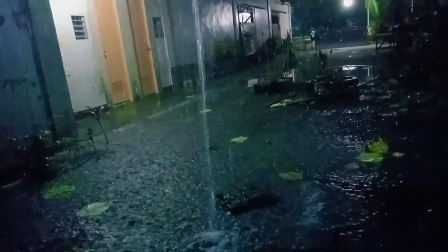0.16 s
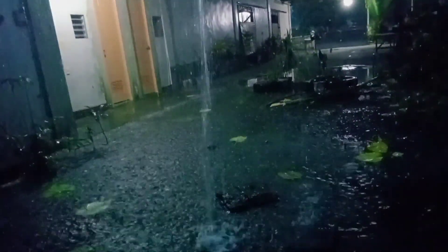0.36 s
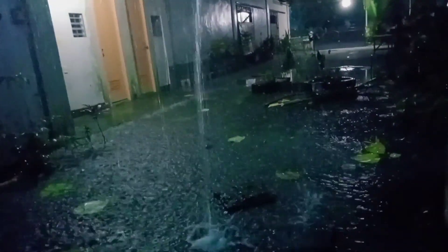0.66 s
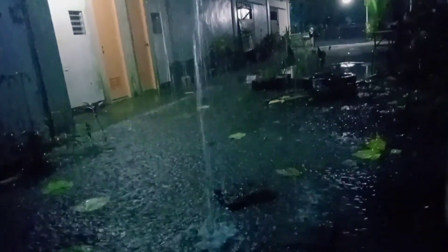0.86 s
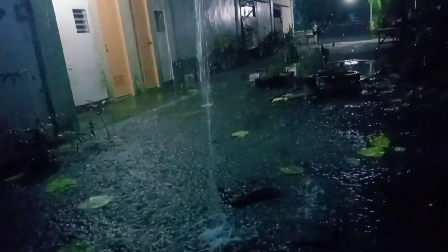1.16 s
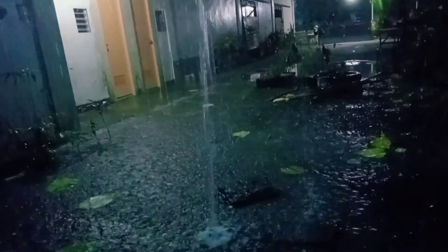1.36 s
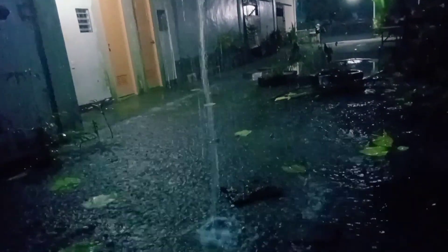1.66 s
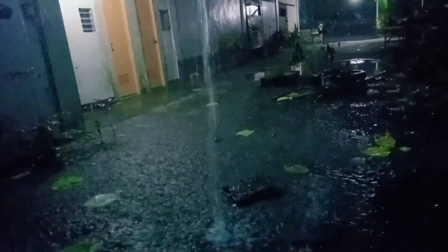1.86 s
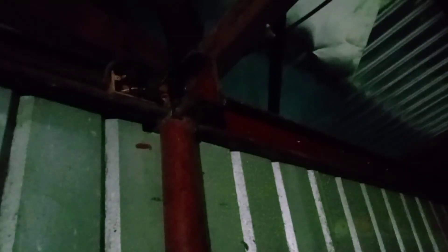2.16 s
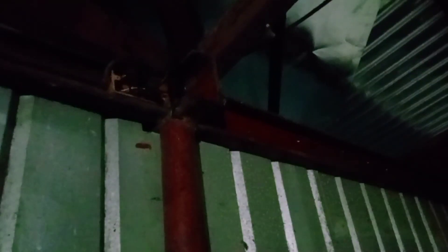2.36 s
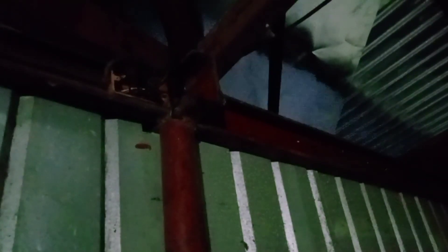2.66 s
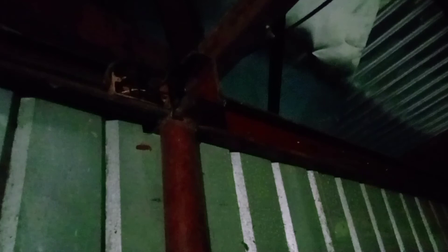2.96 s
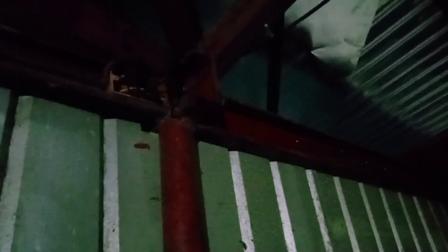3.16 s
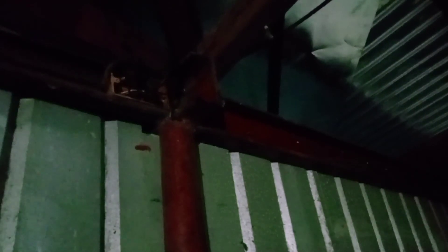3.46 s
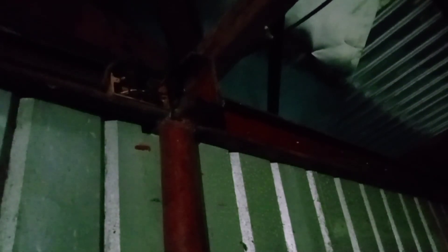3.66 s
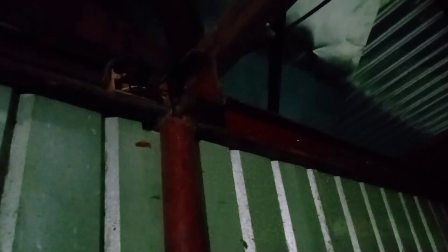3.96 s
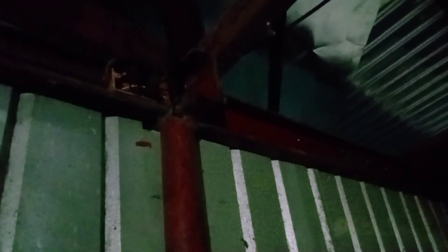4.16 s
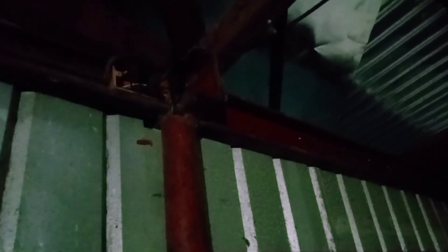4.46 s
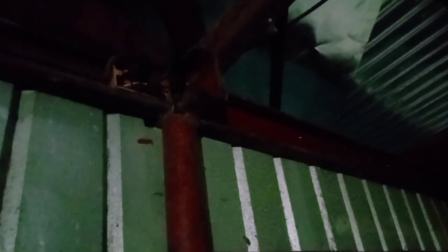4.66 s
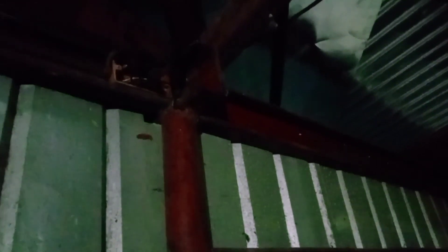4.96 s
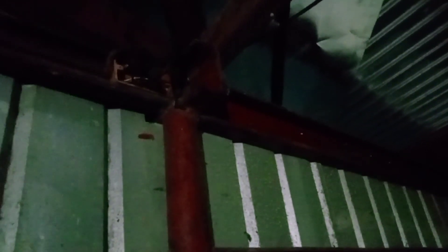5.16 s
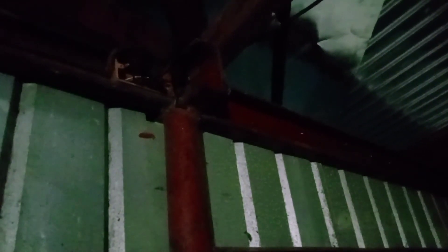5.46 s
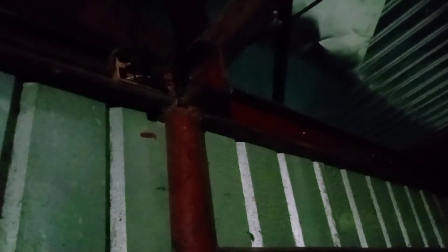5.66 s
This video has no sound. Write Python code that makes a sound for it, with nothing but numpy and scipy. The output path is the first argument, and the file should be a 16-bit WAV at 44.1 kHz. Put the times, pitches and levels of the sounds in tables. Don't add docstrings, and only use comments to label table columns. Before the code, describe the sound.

A dense downpour hisses on standing water, stops dead, and returns as lower metallic roof drumming with gusts and low thunder rumbles.

```python
import sys
import numpy as np
from scipy import signal
from scipy.fft import rfft, irfft, next_fast_len
from scipy.io import wavfile
from scipy.ndimage import uniform_filter1d

SR = 44100
rng = np.random.default_rng(int(sys.argv[2]) if len(sys.argv) > 2 else 0)


def pcm_store(signal):
    levels = np.round(np.clip(np.atleast_2d(signal), -1, 1) * 32767)
    wavfile.write(sys.argv[1], SR, levels.astype(np.int16).T)


def boost_factor(decibels):
    exponent = np.asarray(decibels, float) / 20
    return 10 ** exponent


N = 256662
CHANGE_S = 2.0

# pitch_hz, level_db (per Hz)
YARD_TONE = [(100, -6), (230, -6), (300, -8), (600, -5.5), (1500, -1.5), (2700, -3.5), (4000, -15.5),
             (5300, -21.5), (6800, -18.5), (7500, -28.5), (10300, -37.5), (11400, -32), (13300, -33.5),
             (14500, -40)]
# peak_s, added_share_db
ROAR_SWELLS = [
    (.72, -18),
    (1.3, -19),
]


def yard():
    t = np.arange(N) / SR
    squall_start_s, squall_rise_s, squall_db = 1.3, 0.14, 0.7
    roar_db = -16.5 + squall_db * np.clip((t - squall_start_s) / squall_rise_s, 0, 1)
    spray_db = 0.9 - 1.2 * np.minimum(t, CHANGE_S)
    bubbles = boost_factor(-17) * pings(per_s=900.0, spread_db=1.0, cycles=22.0, low_hz=882, high_hz=12900)
    water = rain(roar_db, spray_db, YARD_TONE, per_s=3000.0, spread_db=2.5, clump_db=1.95,
                 near_low_db=-14.0, near_high_db=-1.5, patchy_db=-0.06, ringing=bubbles)
    thickening = 1 + surges(ROAR_SWELLS, rise_db_per_s=61, fall_db_per_s=61)
    return boost_factor(-2.5) * water * thickening


# pitch_hz, level_db (per Hz)
ROOF_TONE = [(100, -6), (200, -1.5), (400, 0.5), (750, 1), (1200, -0.5), (2300, -1), (3200, -4.5),
             (4600, -8), (7000, -29.5), (8300, -43.5), (9600, -41.5), (11400, -31.5), (12600, -40.5),
             (15000, -47)]


def roof():
    since_s = np.arange(N) / SR - CHANGE_S
    roar_db = -14.5 - 0.5462 * since_s
    spray_db = 0.08 * since_s
    tinks = boost_factor(-21) * pings(per_s=1200.0, spread_db=2.5, cycles=68.0, low_hz=498.8, high_hz=12020)
    return boost_factor(-2.0) * rain(roar_db, spray_db, ROOF_TONE, per_s=4400.0, spread_db=3.0, clump_db=2.05,
                            near_low_db=-9.0, near_high_db=-8.0, patchy_db=0.2, ringing=tinks)


# pitch_hz, level_db
MIC_BASS_LOSS = [(20, -20.5), (30, -19), (52, -13), (85, 0.5), (100, 4)]


def rain(roar_db, spray_db, tone, per_s, spread_db, clump_db, near_low_db, near_high_db, patchy_db, ringing):
    far = rng.standard_normal((2, N))
    near = [drops(per_s, spread_db, clump_db), drops(per_s, spread_db, clump_db)]
    edges_hz = 20 * 2 ** np.arange(0, 10.1, 0.5)
    out = ringing
    for k, (low_hz, high_hz) in enumerate(zip(edges_hz, edges_hz[1:])):
        log_middle = np.log(low_hz * high_hz) / 2
        near_db = np.interp(log_middle, np.log([300, 12000]), [near_low_db, near_high_db])
        struck = (far[k % 2] + boost_factor(near_db) * near[k % 2]) / np.sqrt(1 + boost_factor(2 * near_db))
        half_octave = signal.butter(2, [low_hz, high_hz], "band", fs=SR, output="sos")
        band = signal.sosfilt(half_octave, struck)
        swing_db = spray_db * np.interp(log_middle, np.log([5000, 8000]), [0, 1])
        out = out + boost_factor(swing_db + patchy_db * drift(15.0)) * band
    return boost_factor(roar_db) * rms_one(coloured(out, tone, MIC_BASS_LOSS))


def drops(per_s, spread_db, clump_db):
    size_db = spread_db * np.minimum(rng.exponential(1, N), 5)
    sizes = boost_factor(size_db) * rng.choice([-1, 1], N)
    chance = per_s * boost_factor(clump_db * drift(25.0)) / SR
    return rms_one(sizes * (rng.random(N) < chance))


def pings(per_s, spread_db, cycles, low_hz, high_hz):
    hits = drops(per_s, spread_db, clump_db=3.0)
    dealt = rng.integers(0, 24, N)
    out = 0
    for k, hz in enumerate(np.geomspace(low_hz, high_hz, 24)):
        r = boost_factor(-60 * hz / (cycles * SR))
        w = 2 * np.pi * hz / SR
        struck = hits * (dealt == k) + 1e-18
        out = out + signal.lfilter([np.sin(w) * np.sqrt(1 - r)], [1, -2 * r * np.cos(w), r * r], struck)
    return rms_one(out)


# peak_s, level_db
GUSTS_ON_SHEET = [
    (2.3, -31),
    (2.68, -25.5),
    (3.3, -31),
    (3.7, -32),
    (4.5, -29),
    (5.7, -32),
]


def sheet():
    resonance = [(400, -40), (620, -4), (770, 0), (950, -5), (1500, -50)]
    hum = coloured(drops(1500.0, spread_db=2.5, clump_db=2.5), resonance)
    return surges(GUSTS_ON_SHEET, rise_db_per_s=28.5, fall_db_per_s=45.0) * rms_one(hum)


# start_s, level_db
SPRAY_BURSTS = [
    (0.174, -41),
    (.195, -44),
    (.262, -48),
    (.385, -49),
    (1.215, -46),
    (1.245, -47),
    (1.53, -46.5),
    (3.435, -53),
    (3.515, -52),
]


def splashes():
    t = np.arange(N) / SR
    t60_s = 0.11
    level = np.zeros(N)
    for start_s, level_db in SPRAY_BURSTS:
        level += (t > start_s) * boost_factor(level_db - 60 * np.maximum(t - start_s, 0) / t60_s)
    top_band = [(8000, -55.5), (10800, -10.5), (11500, -3.0), (13300, -2.5), (15000, -23)]
    spray = coloured(drops(6000.0, spread_db=3.0, clump_db=2.5), top_band)
    return level * rms_one(spray)


# peak_s, level_db
THUNDER_PEALS = [(.1, -39), (.45, -36.5), (1.03, -41), (1.85, -35), (2.27, -25), (2.68, -31.5),
                 (2.9, -35.5), (3.15, -36), (3.65, -31.5), (4.0, -38), (4.25, -34.5), (4.5, -39.5),
                 (5.2, -39), (5.6, -35.5)]
# middle_s, length_s, pitch_hz, level_db
THUNDER_BOOMS = [(0.615, 0.14, 232, -37.5), (1.826, 0.12, 139, -28), (2.266, 0.17, 120, -30),
                 (2.294, 0.11, 150, -34.5), (3.013, .1, 119, -33.5), (3.233, 0.24, 118.5, -26),
                 (3.586, 0.11, 118, -33), (3.757, 0.077, 118, -33), (3.888, 0.11, 119, -32.5),
                 (4.35, 0.056, 142, -37), (5.078, 0.17, 227, -35.5)]


def thunder():
    t = np.arange(N) / SR
    rumble = [(90, 0.5), (170, -3.5), (320, -26), (800, -62)]
    roll = rms_one(coloured(rng.standard_normal(N), rumble, MIC_BASS_LOSS))
    lumps = boost_factor(3.7 * drift(6.2))
    out = surges(THUNDER_PEALS, rise_db_per_s=46.5, fall_db_per_s=91) * lumps * roll
    wobble = 0.75 * drift(8.7)
    for middle_s, length_s, hz, level_db in THUNDER_BOOMS:
        swell = np.cos(np.pi * np.clip((t - middle_s) / (1.23 * length_s), -0.5, 0.5))
        out += boost_factor(level_db + 5.5) * swell * np.sin(2 * np.pi * hz * t + wobble)
    return out


def surges(rows, rise_db_per_s, fall_db_per_s):
    t = np.arange(N) / SR
    gain = 0
    for peak_s, level_db in rows:
        gain = gain + boost_factor(level_db - np.maximum(rise_db_per_s * (peak_s - t), fall_db_per_s * (t - peak_s)))
    return gain


def drift(rate_hz):
    r = np.exp(-80 * np.pi * rate_hz / SR)
    noise = rng.standard_normal(N // 40 + 2002)
    slow = signal.lfilter([1], [1, -2 * r, r * r], noise)[2000:]
    return np.interp(np.arange(N) / 40, np.arange(len(slow)), rms_one(slow))


def coloured(x, *spectra):
    size = next_fast_len(N)
    log_hz = np.log(np.arange(size // 2 + 1) * SR / size + 1)
    gain_db = 0
    for spectrum in spectra:
        hz, db = np.transpose(spectrum)
        gain_db = gain_db + np.interp(log_hz, np.log(hz), db)
    return irfft(rfft(x, size) * boost_factor(gain_db), size)[:N]


def rms_one(x):
    return x / np.sqrt(np.mean(x ** 2) + 1e-20)


def suppress_noise(x, floor_db, over):
    spectrum = signal.stft(x, nperseg=1024, noverlap=768)[2]
    power = np.abs(spectrum) ** 2 + 1e-20
    steady = uniform_filter1d(uniform_filter1d(power, size=9, axis=1), size=31, axis=2)
    hz = np.arange(513)[:, None] * SR / 1024
    bite = np.interp(hz, [120, 250, 1500, 4500], [0.1, 0.8, 0.75, 1])
    floor = boost_factor(floor_db * bite)
    gain = np.maximum(floor, np.sqrt(np.clip(1 - over * steady / power, 0, 1))) / floor
    return signal.istft(spectrum * gain, nperseg=1024, noverlap=768)[1][:, :N]


def scene_change_gain():
    t = np.arange(N) / SR
    silence_s, open_s, opening_s, full_s = 1.869, 2.068, 0.03, 2.2366
    opening = np.clip((t - open_s) / opening_s, 0, 1) ** 2
    fade_in = opening * boost_factor(-176 * np.maximum(full_s - t, 0))
    return boost_factor(3) * np.where(t < silence_s, 1, fade_in)


def scene():
    t = np.arange(N) / SR
    downpour = np.where(t < CHANGE_S, yard(), roof() + sheet())
    return (downpour + thunder() + splashes())[None]


def band_limit(x):
    return signal.sosfilt(signal.butter(12, 15420, fs=SR, output="sos"), x)


def record(dry):
    cleaned = suppress_noise(dry, floor_db=-4.3, over=1.2)
    ceiling = 1.18
    mix = ceiling * np.tanh(cleaned * scene_change_gain() / ceiling)
    return band_limit(mix)


dry = scene()
out = record(dry)
pcm_store(out)
```